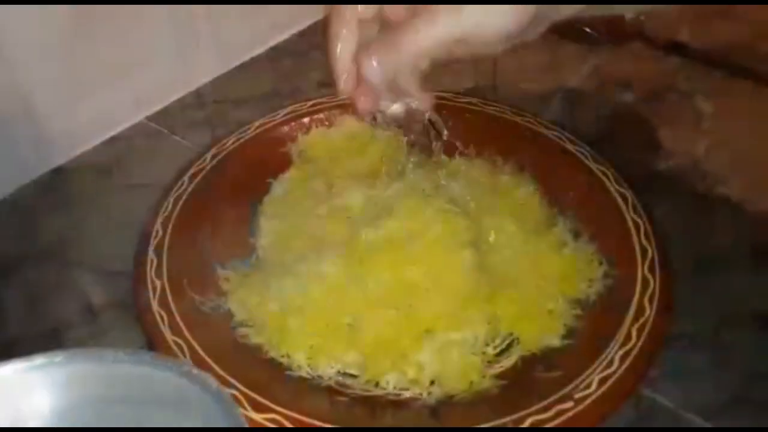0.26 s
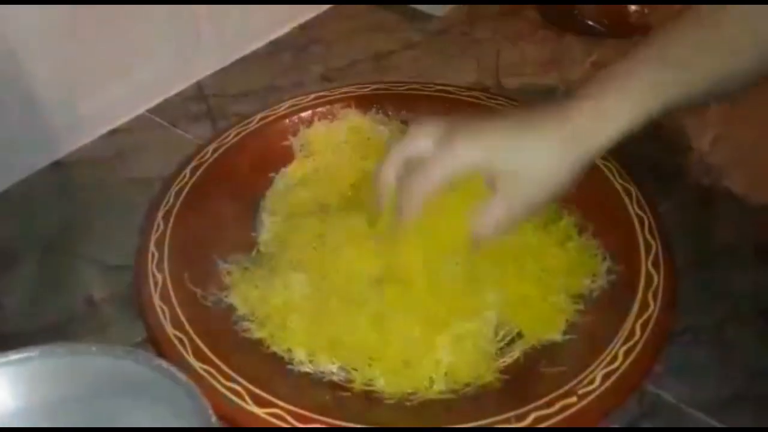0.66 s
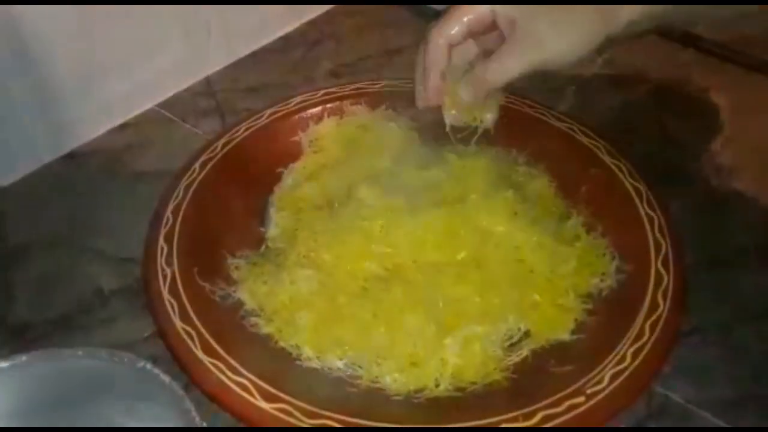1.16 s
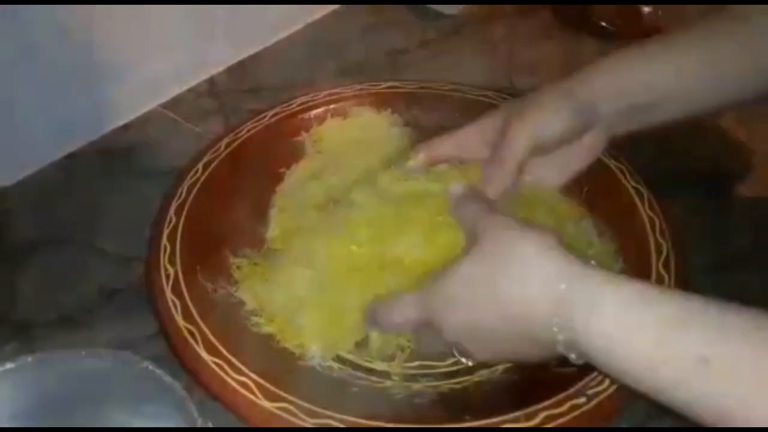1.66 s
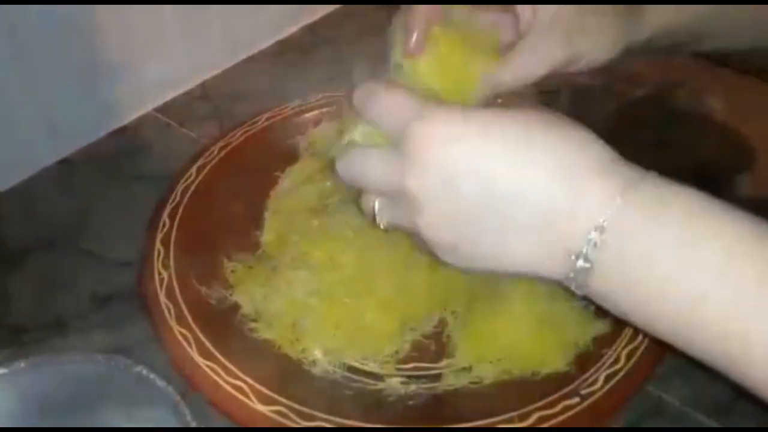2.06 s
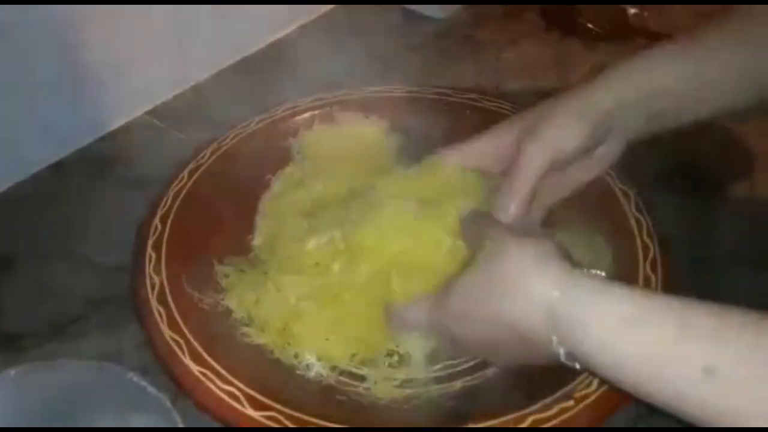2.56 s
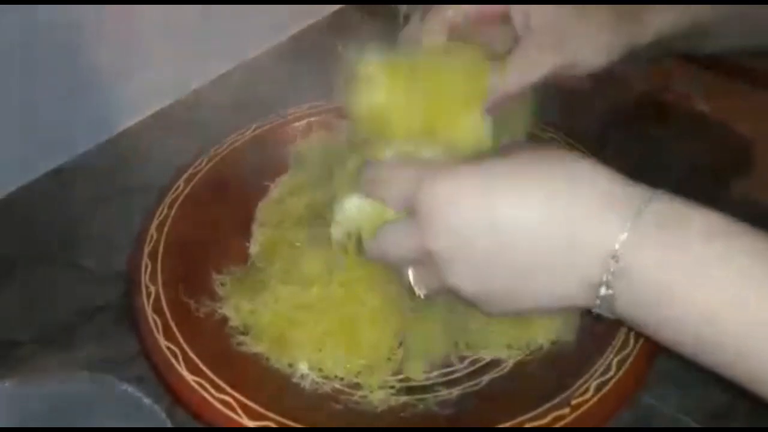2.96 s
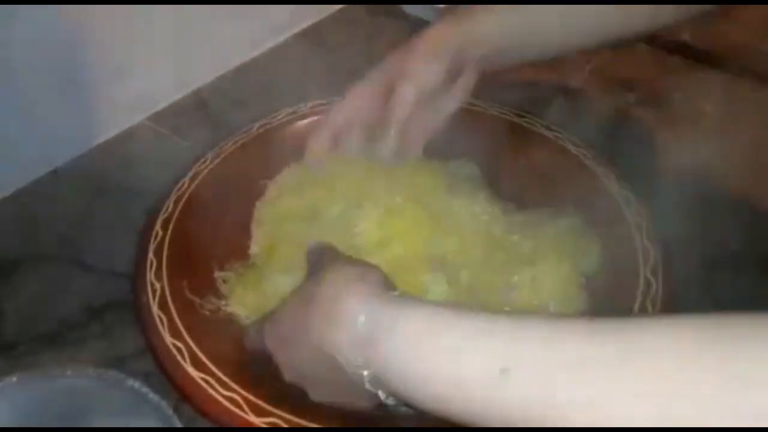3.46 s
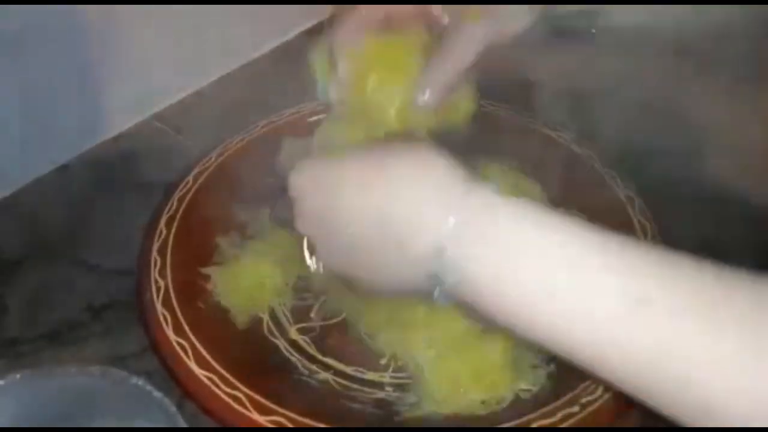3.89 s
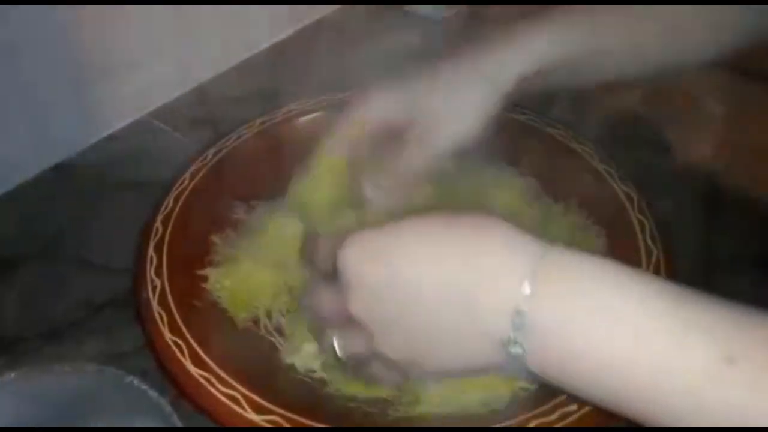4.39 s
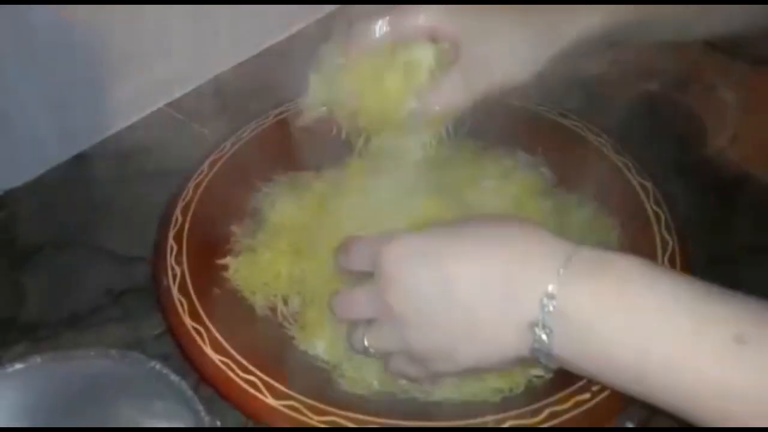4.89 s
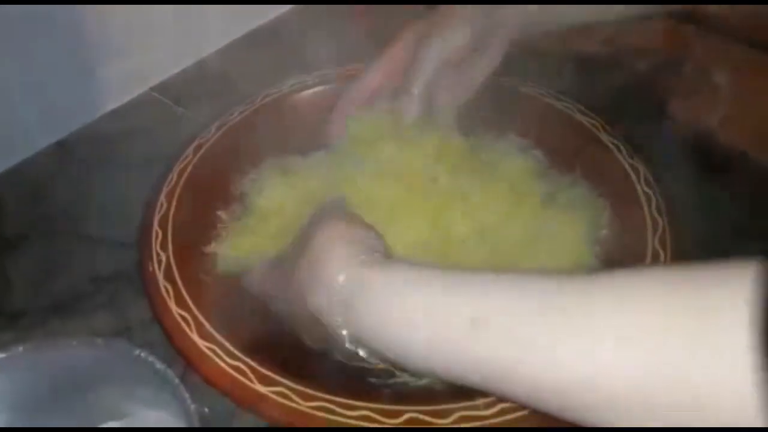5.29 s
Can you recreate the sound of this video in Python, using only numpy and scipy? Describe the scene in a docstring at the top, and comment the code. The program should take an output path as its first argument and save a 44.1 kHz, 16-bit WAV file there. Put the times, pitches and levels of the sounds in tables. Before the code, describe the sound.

Water splats, a metal basin bangs down on a counter, then a ring clacks on clay amid faint sticky crackles and pot hiss.

```python
"""In a small kitchen, wet hands loosen steamed vermicelli in a clay dish while a pot rumbles and steams.
Drops from the fingers are short noisy splats and rising tones; sticky strands are random ticks and snaps.
A metal basin lands with ringing tones, a thud and a clack, then scuffs along the counter.
A finger ring taps the dish: short noise plus the dish's tones. The recorder's gain sinks after loud blows."""
import sys
import numpy as np
from scipy import signal
from scipy.fft import rfft, irfft, next_fast_len
from scipy.io import wavfile
from scipy.ndimage import map_coordinates

SR = 44100
rng = np.random.default_rng(int(sys.argv[2]) if len(sys.argv) > 2 else 0)


def store_wav(level_fs):
    """Save 16-bit WAV to argv[1]."""
    pcm = np.round(np.clip(np.atleast_2d(level_fs), -1, 1) * 32767)
    wavfile.write(sys.argv[1], SR, pcm.T.astype(np.int16))


N = 243985  # length of the scene in samples
T = np.arange(SR // 2) / SR  # time since a short sound began (s)

# In all tables t60 is the time a sound takes to fall by 60 dB.
# Colours of noise, as points on a curve; only their shape counts: f/Hz, level/dB (per Hz)
RUMBLE_COLOUR = [(21, -44), (36, -18), (86, 0), (113, -7), (209, -10), (245, -6.5), (453, -13.5),
                 (561, -15), (940, -24), (1100, -24.5), (1430, -43), (2420, -120)]  # low rumble of the pot
WHIRR_COLOUR = [(800, -27), (1150, -7), (1280, 3.5), (1360, -1), (1480, 7), (1570, -3.5), (1700, -10.5),
                (2200, -30)]  # narrow whirr of the pot
HISS_COLOUR = [(1000, -65), (1700, -11), (1900, -6.5), (2440, -6.5), (2800, -4), (3100, 0), (5710, 2.5),
               (6740, -1), (7060, 2.5), (8340, -12), (9760, -5), (10500, 1.5), (15500, -4)]  # steam
SPLAT_COLOUR = [(1180, -41), (2000, -37), (2460, -11), (4000, -6), (4590, -1), (7110, 4), (8290, -8.5),
                (11600, 2.5), (15500, -2.5)]  # wet smack
STRAND_COLOUR = [(900, -15), (1900, -3), (3600, 0.5), (6800, -2.5), (8400, -8), (11000, 3), (15000, -1)]  # tiny wet ticks
CLACK_COLOUR = [(180, -17.5), (300, -12), (439, -4), (535, -9.5), (808, -7.5), (1280, -19), (1750, -23.5),
                (1940, -33), (2140, -19), (3130, -22.5), (5660, -22), (5950, -16), (8560, -30),
                (11100, -26.5), (15500, -40)]  # hard contact of the basin
SCUFF_COLOUR = [(50, -35.5), (90, 11), (160, -1), (330, 0), (520, -12.5), (1200, -14), (3000, -68)]  # basin shifting on the counter
TAP_COLOUR = [(88, -27), (150, -15), (643, -23), (781, -11.5), (1540, -10), (1800, 0), (2140, -17),
              (2500, 3), (2860, -7), (3220, -3.5), (4560, -6), (6230, -3.5), (8330, -14.5), (10500, -7.5),
              (15500, -22.5)]  # finger ring skidding on the glaze

# How long the room answers at each pitch: f/Hz, t60/s
ROOM_DECAY = [(120, 0.66), (400, 0.42), (1000, 0.49), (3000, 0.41), (6000, 0.3), (13000, 0.27)]

# Big drops falling on the heap: t/s, splat level/dB, splat and bubble f/Hz, bubble level/dB
DROPS = [(.003, -35, 2140, -33.5), (0.0688, -27, 7200, -40), (0.0852, -33, 5280, -37),
         (.173, -36.5, 3950, -34), (.212, -34.5, 3590, -40), (.2224, -35.5, 4550, -51),
         (.2733, -38, 7000, -48), (.293, -44, 3550, -41.5), (.3115, -34, 5670, -36),
         (.397, -34.5, 3200, -45), (0.4178, -36, 3710, -46)]
# Strokes of the hand through the heap: middle t/s, length/s, peak level/dB, strongest f/Hz
RUBS = [(0.666, 0.23, -55.5, 11000), (2.043, 0.11, -54, 2520), (3.793, 0.45, -56.5, 5000),
        (4.444, 0.21, -56, 2470), (4.793, 0.27, -59, 2470), (5.464, 0.18, -51.5, 6050)]
# Sticky clumps tearing apart: t/s, level/dB, strongest f/Hz
SNAPS = [(3.032, -46.5, 3000), (3.658, -40.5, 11200), (3.8054, -43.5, 5300), (3.933, -40, 10300),
         (4.624, -45, 10500), (5.443, -41, 6500)]
# Wet skin squeaking on the glaze: t/s, starting f/Hz, level/dB, life/s
SQUEAKS = [(1.718, 1364, -40.5, 0.051), (5.474, 2260, -38.5, 0.043)]

# Basin meeting the counter: t/s, overall level/dB, then within it ring level/dB, thud level/dB,
# clack level/dB; last the delay of the clack/s
BASIN_HITS = [(1.019, -0.5, -10, -11, -9.5, 0.00031), (1.243, 1, -32.5, -3, -19, 0.0027),
              (1.274, -17.5, -46, -9, -14.5, .002)]
# Ringing tones of the basin: f/Hz, level/dB, t60/s (shortened where above the limit set in basin())
BASIN_TONES = [(324.3, -2, 0.18), (407.7, -1, 0.43), (618, -16.5, 0.37), (723, -24, 0.34),
               (824.5, -10, 0.31), (893, -25, .45), (952, -18.5, 0.29), (1400, -3, 0.11), (1757, -6, 0.2),
               (2150, -31, 0.33), (2430, -17, 0.17), (2490, -10, 0.17), (3555, -21.5, 0.16),
               (3640, -17.5, 0.24), (4370, -29, 0.11), (5540, -8, 0.091), (6500, -19, 0.11),
               (7540, -10.5, 0.087), (10500, -32, 0.22)]
# Dull tones of the counter: f/Hz, level/dB, t60/s
COUNTER_TONES = [(86.6, -20, 0.16), (144.7, -15, 0.184), (197, -4.5, 0.077), (248.5, -10.5, 0.11),
                 (292.7, 2.5, 0.08), (372, -4.5, 0.03), (478, -25, 0.13), (648, -19, 0.11),
                 (818, -13.5, 0.073), (1072, -23.5, 0.092)]

# Finger ring tapping the dish: t/s, overall level/dB, dish level/dB within it, treble lift/dB,
# room level/dB, contact f/Hz, contact lift/dB, lift of the rim's note/dB
TAPS = [(1.578, -0.5, -21, 1, -9, 6180, 4.5, 7.5), (2.496, -10.7, -22, 3.5, -3.5, 3290, 6.5, 3.5),
        (3.406, -8, -20.5, 1.5, -3.5, 3960, 6.5, 1), (5.2496, -14.5, -18.5, -5, -2, 6150, 11, -1.5)]
# Groups of close tones in the dish: middle f/Hz, half-width/Hz (to 6 dB down), level/dB
DISH_TONES = [(360, 270, -9), (783, 146, -6), (1186, 89, -3.5), (1820, 98, -3), (2507, 117, 4),
              (2970, 56, 0), (3276, 60, 6.5), (3640, 180, -2.5), (4090, 58, 4), (5080, 77, -1),
              (6150, 23, -20), (7200, 300, -6), (10350, 310, -11.5)]

RUMBLE_DB, WHIRR_DB, HISS_DB = -55, -61, -52.5  # middle levels of the pot's three sounds
BUBBLE_LIFE_S = 0.016  # t60 of a bubble
PITCH_RISE = 0.126  # share by which a bubble or squeak climbs
SPLAT_EDGE_SHARE = 0.78  # a splat has little sound below this share of its pitch
SPRAY_GAP_S, SPRAY_DB, SPRAY_HZ = 0.014, -9, 12000  # average gap, level against the drop, colour
SPRINKLE_DB, SPRINKLE_FADE_DB_PER_S, SPRINKLE_HZ = -46, 24, 6500  # starting level, fade, colour
SLIDE_STOP_S, SLIDE_DB = 1.572, -39.5  # the basin's scuff is strongest here, at this level
SLIDE_RISE_DB_PER_S, SLIDE_FALL_DB_PER_S = 173, 295
RIM_HZ = 1880  # note that is strong or weak according to where the dish is struck
GAIN_THRESHOLD_DB, GAIN_CUT_SHARE = -23.5, 0.3  # dB of cut for each dB above the threshold
GAIN_ATTACK_S, GAIN_RELEASE_DB_PER_S = 0.046, 0.4
TOP_HZ = 15650  # upper band limit


def amp(db):
    """Turn decibels into a multiplier."""
    return 10 ** (np.asarray(db) / 20)


def unit(x):
    """Scale to an average strength (rms) of 1."""
    return x / np.sqrt(np.mean(x ** 2) + 1e-20)


def along(points, hz):
    """Read a curve of (Hz, value) points, with pitch spaced by ratio as we hear it."""
    f, value = np.transpose(points)
    return np.interp(np.log(hz + 1), np.log(f + 1), value)


def wobble(rate):
    """A smooth random curve through `rate` random points a second."""
    points = rng.standard_normal(int(N * rate / SR) + 4)
    return map_coordinates(points, [np.arange(N) * rate / SR])


def filtered(x, response):
    """Multiply each frequency in x by response(Hz)."""
    size = next_fast_len(len(x) + SR // 8)
    spectrum = rfft(x, size) * response(np.fft.rfftfreq(size, 1 / SR))
    return irfft(spectrum, size)[:len(x)]


def noise(colour, size):
    """Noise of rms 1 with the given balance of low and high."""
    return unit(filtered(rng.standard_normal(size), lambda hz: amp(along(colour, hz))))


def lifted(x, centre_hz, lift_db, octaves):
    """Raise one band of x (lower it if lift_db is negative), then scale to rms 1."""
    def bump(hz):
        distance = np.log2((hz + 1) / centre_hz) / octaves
        return amp(lift_db * np.exp(-distance ** 2))
    return unit(filtered(x, bump))


def swell(rise, t60):
    """A loudness curve that builds up, reaches 1 and dies away."""
    shape = (1 - np.exp(-T / rise)) ** 2 * amp(-60 * T / t60)
    return shape / shape.max()


def add(track, s, sound):
    """Mix a sound into the track at time s."""
    part = track[max(round(s * SR), 0):][:len(sound)]
    part += sound[:len(part)]


def kitchen(x, wet_db):
    """Add the echo of the hard walls: fading noise whose treble dies first."""
    hz, t, z = signal.stft(rng.standard_normal(len(T)), SR, nperseg=256)
    fade = amp(-60 * t / along(ROOM_DECAY, hz)[:, None])
    tail = signal.istft(z * fade, SR, nperseg=256)[1][:len(T)]
    tail = tail * (1 - np.exp(-T / 0.0019))  # the echo builds up in about 2 ms
    echo = signal.fftconvolve(x, tail / np.linalg.norm(tail))[:len(x)]
    return x + amp(wet_db) * echo


def stove():
    """The pot makes a low rumble, a narrow whirr and a fine steam hiss, all wavering in level."""
    rumble = amp(RUMBLE_DB + 1.0 * wobble(8.4)) * noise(RUMBLE_COLOUR, N)
    whirr = amp(WHIRR_DB + 1.2 * wobble(10)) * noise(WHIRR_COLOUR, N)
    hiss = amp(HISS_DB + 0.41 * wobble(24.9)) * noise(HISS_COLOUR, N)
    return rumble + whirr + hiss


def crackle(rate, scatter_db):
    """Tiny wet ticks of unequal size at random moments, on average `rate` a second."""
    happens = rng.random(N) < rate / SR
    size = rng.standard_normal(N) * amp(scatter_db * rng.standard_normal(N))
    return filtered(happens * size, lambda hz: amp(along(STRAND_COLOUR, hz)))


def splat(hz):
    """A short wet smack: a burst of noise lifted at its pitch and lying mostly above it."""
    smack = lifted(noise(SPLAT_COLOUR, len(T)), hz, lift_db=3, octaves=0.18)
    edge_hz = SPLAT_EDGE_SHARE * hz
    smack = filtered(smack, lambda f: 1 - 1 / (1 + (f / edge_hz) ** 6))
    return unit(smack) * swell(rise=0.00049, t60=0.03)


def chirp(hz, life):
    """A brief tone whose pitch climbs and trembles, for bubbles and squeaks."""
    tremble = 0.08 * wobble(1500)[:len(T)] * hz / (hz + 2000)
    pitch = hz * (1 + PITCH_RISE * np.minimum(T / life, 1) + tremble)
    return np.sin(2 * np.pi * np.cumsum(pitch) / SR) * swell(rise=life / 2, t60=life)


def water(droplets=2):
    """Each drop splats, traps a ringing bubble and throws off droplets, amid a fading sprinkle."""
    splats, bubbles = np.zeros(N), np.zeros(N)
    for s, db, hz, bubble_db in DROPS:
        add(splats, s, amp(db) * splat(hz))
        add(bubbles, s, amp(bubble_db) * chirp(hz, BUBBLE_LIFE_S))
        gaps = SPRAY_GAP_S * (0.5 + rng.random(droplets))
        for flight in np.cumsum(gaps):
            add(splats, s + flight, amp(db + SPRAY_DB) * splat(SPRAY_HZ))
    # the fine water thins out as the fingers run dry
    sprinkle = lifted(crackle(rate=3000, scatter_db=2.5), SPRINKLE_HZ, lift_db=9, octaves=0.6)
    splats += amp(SPRINKLE_DB - SPRINKLE_FADE_DB_PER_S * np.arange(N) / SR) * sprinkle
    return kitchen(splats, wet_db=-5.5) + kitchen(bubbles, wet_db=-7.5)


def strands():
    """Strands part in tiny ticks under each stroke; now and then a clump snaps or wet skin squeaks."""
    t = np.arange(N) / SR
    out, squeaks = np.zeros(N), np.zeros(N)
    rustle = crackle(rate=1600, scatter_db=2.0)
    for s, length, db, hz in RUBS:
        stroke = amp(db) * np.exp(-2 * ((t - s) / length) ** 2)
        out += stroke * lifted(rustle, hz, lift_db=7.5, octaves=0.59)
    for s, db, hz in SNAPS:
        add(out, s, amp(db) * splat(hz))
    for s, hz, db, life in SQUEAKS:
        add(squeaks, s, amp(db) * chirp(hz, life))
    return kitchen(out, wet_db=-3.5) + kitchen(squeaks, wet_db=-7)


def struck_tones(tones, scatter_db, longest):
    """One blow sets many fading tones going; neighbours swing in opposite directions."""
    hz, db, t60 = np.transpose(tones)[:, :, None]
    direction = (-1) ** np.arange(len(hz))[:, None]
    gain = amp(db + scatter_db * rng.standard_normal(hz.shape)) * direction
    fade = amp(-60 * T / np.minimum(t60, longest))
    waves = gain * fade * np.sin(2 * np.pi * hz * T)
    strength = np.sqrt(np.sum(gain ** 2) / 2)
    return waves.sum(0) / strength * (1 - np.exp(-T / 0.0048))  # soft start of about 5 ms


def basin():
    """The metal rings, the counter thuds and a hard clack follows; then the basin shifts a little."""
    out = np.zeros(N)
    for s, db, ring_db, thud_db, clack_db, lag in BASIN_HITS:
        metal = amp(ring_db) * struck_tones(BASIN_TONES, scatter_db=1.0, longest=0.39)
        thud = amp(thud_db) * struck_tones(COUNTER_TONES, scatter_db=2.0, longest=0.35)
        clack = amp(clack_db) * noise(CLACK_COLOUR, len(T)) * swell(rise=0.0016, t60=0.05)
        add(out, s, amp(db) * (kitchen(metal, wet_db=-12) + kitchen(thud, wet_db=-13.5)))
        add(out, s + lag, amp(db) * kitchen(clack, wet_db=-6))
    # the scuff grows ever harder until the basin stops
    t = np.arange(N) / SR - SLIDE_STOP_S
    slide_db = SLIDE_DB + np.minimum(SLIDE_RISE_DB_PER_S * t, -SLIDE_FALL_DB_PER_S * t)
    out += amp(slide_db) * noise(SCUFF_COLOUR, N)
    # the counter is too small to radiate deep bass
    return signal.sosfilt(signal.butter(2, 85, "high", fs=SR, output="sos"), out)


def dish_response(hz):
    """How strongly the clay dish answers at each frequency: a sum of rounded peaks."""
    power = 0
    for centre, width, db in DISH_TONES:
        power = power + (amp(db) / (1 + ((hz - centre) / width) ** 2)) ** 2
    return np.sqrt(power)


def taps():
    """The finger ring skids on the glaze for some milliseconds and wakes the loaded dish."""
    out = np.zeros(N)
    for s, db, dish_db, treble_db, room_db, contact_hz, lift_db, rim_db in TAPS:
        skid = lifted(noise(TAP_COLOUR, len(T)), contact_hz, lift_db, octaves=0.14)
        skid = lifted(skid, RIM_HZ, rim_db, octaves=0.26)
        skid = lifted(skid, 9700, treble_db, octaves=1.0)
        crack = amp(-10.5) * skid * swell(rise=0.0045, t60=0.023)
        # each tap wakes a new mix of the dish's close tones; the food damps them
        tones = filtered(rng.standard_normal(len(T)), dish_response)
        tones = lifted(tones, RIM_HZ, rim_db, octaves=0.32)
        clay = amp(dish_db) * tones * swell(rise=0.00054, t60=0.22)
        # the tone under the point of contact stands out as a short ping
        ping = np.sin(2 * np.pi * contact_hz * T) * swell(rise=0.00087, t60=0.052)
        ping = amp(lift_db - 32) * ping
        add(out, s, amp(db) * kitchen(crack + clay + ping, room_db))
    return out


def gain_control(x):
    """Turn the sound down when its smoothed level is high, then creep back at a steady rate."""
    keep = np.exp(-1 / (GAIN_ATTACK_S * SR))
    power = signal.lfilter([1 - keep], [1, -keep], x ** 2)
    level_db = 10 * np.log10(power + 1e-20)
    wanted_db = GAIN_CUT_SHARE * np.maximum(level_db - GAIN_THRESHOLD_DB, 0)
    # hold the greatest cut so far, less what has been given back since
    release_db = GAIN_RELEASE_DB_PER_S * np.arange(N) / SR
    cut_db = np.maximum.accumulate(wanted_db + release_db) - release_db
    return x * amp(-cut_db)


def scene():
    """All sources added together at one microphone."""
    return (stove() + water() + strands() + basin() + taps())[None]


def record(dry):
    """The recorder rides its gain and keeps nothing above its band limit."""
    def band_limit(hz):
        return np.clip((TOP_HZ - hz) / 200 + 0.5, 0, 1)  # slope 200 Hz wide
    return np.array([filtered(gain_control(x), band_limit) for x in dry])


dry = scene()
out = record(dry)
store_wav(out)
```